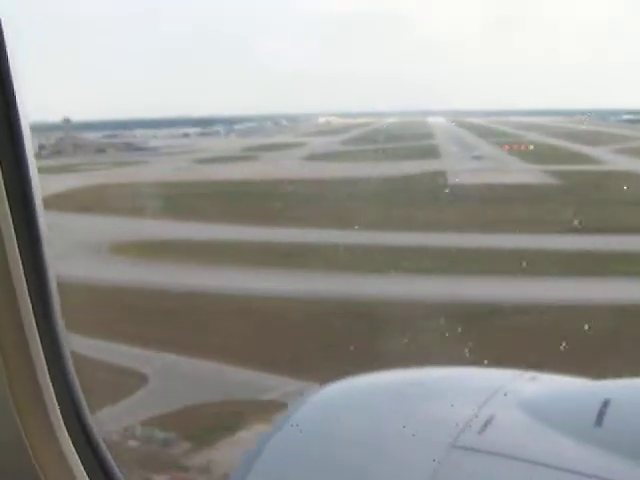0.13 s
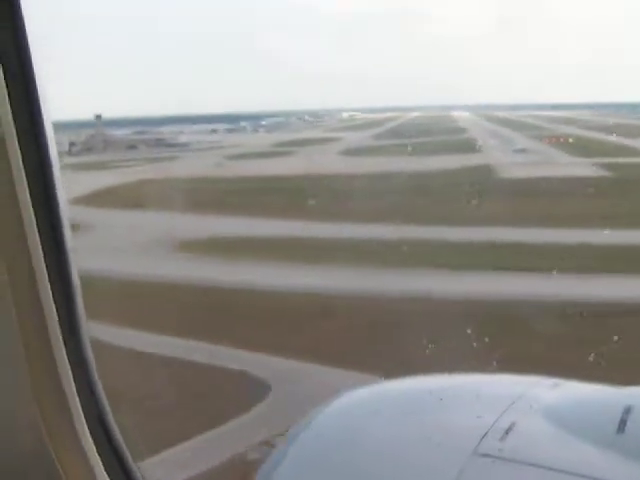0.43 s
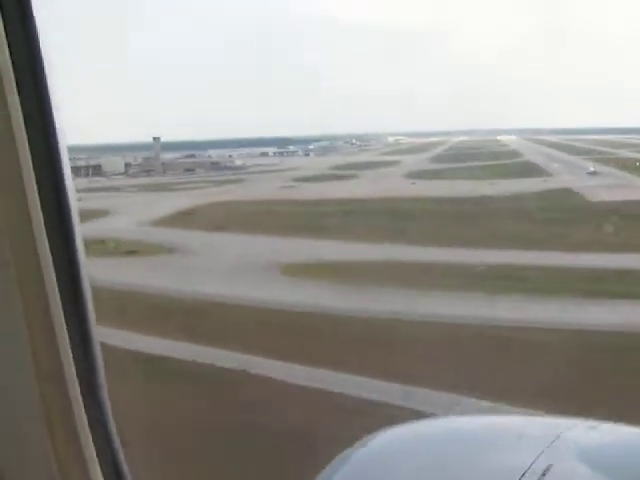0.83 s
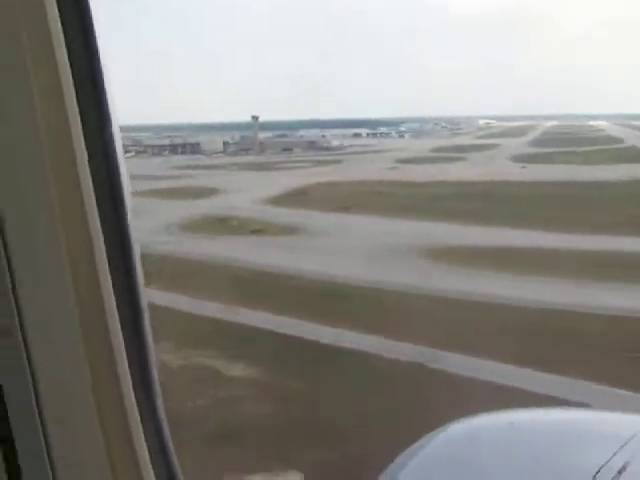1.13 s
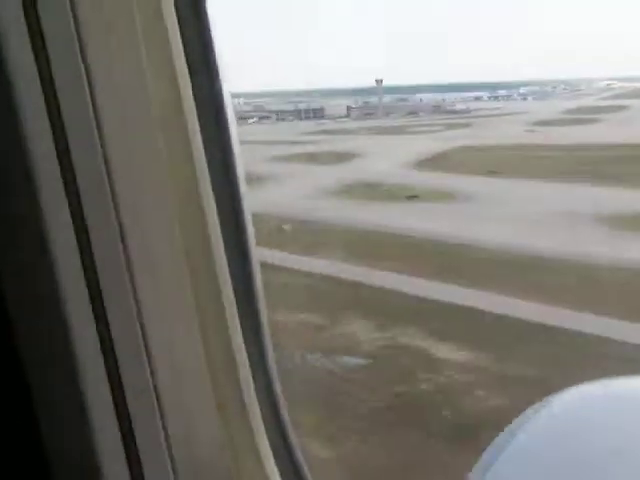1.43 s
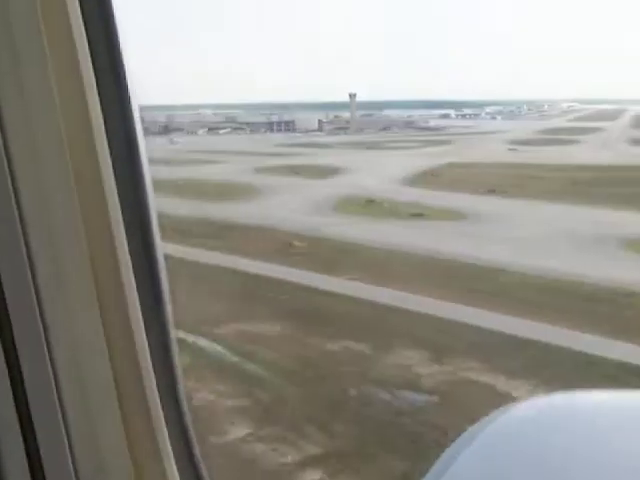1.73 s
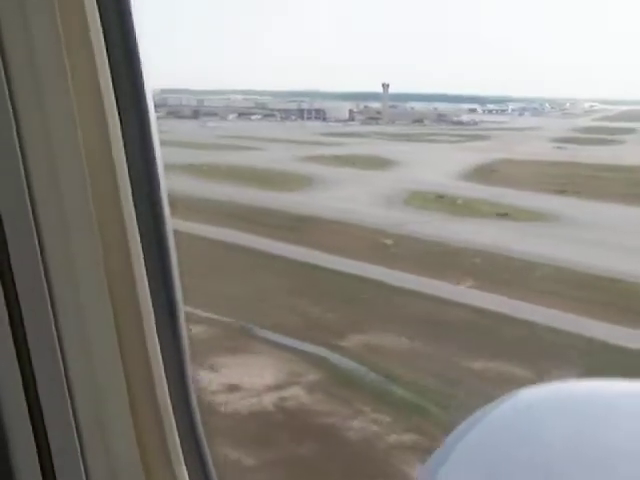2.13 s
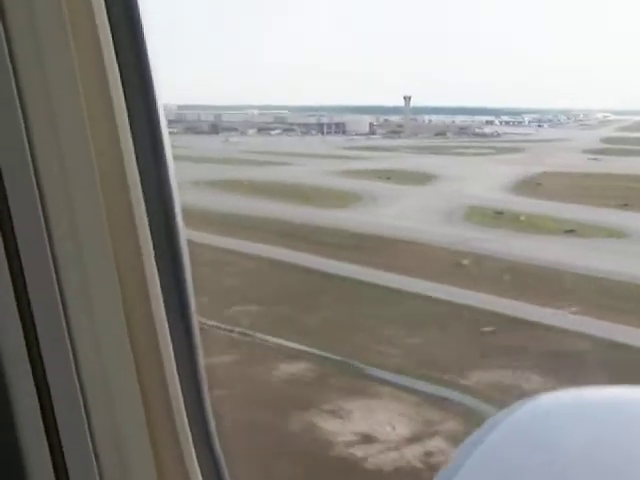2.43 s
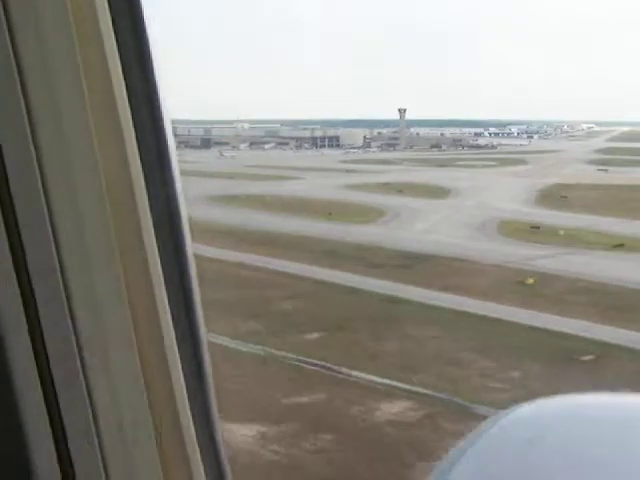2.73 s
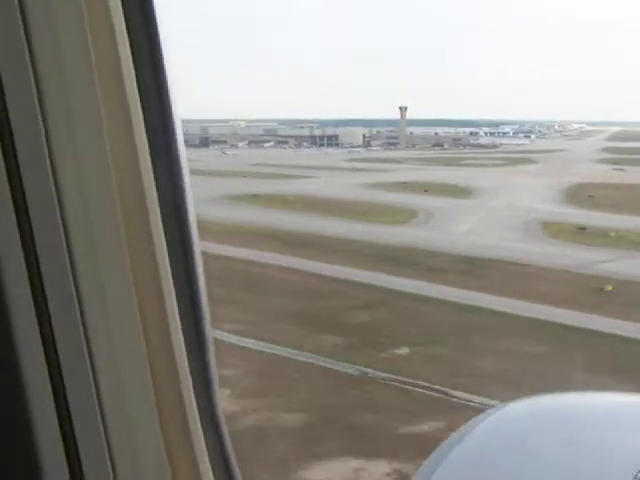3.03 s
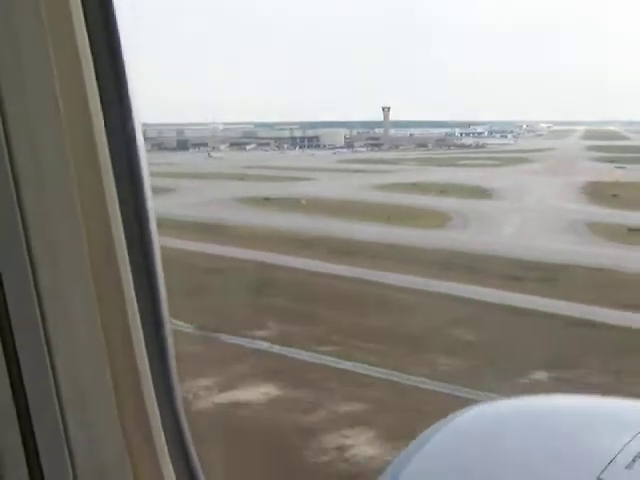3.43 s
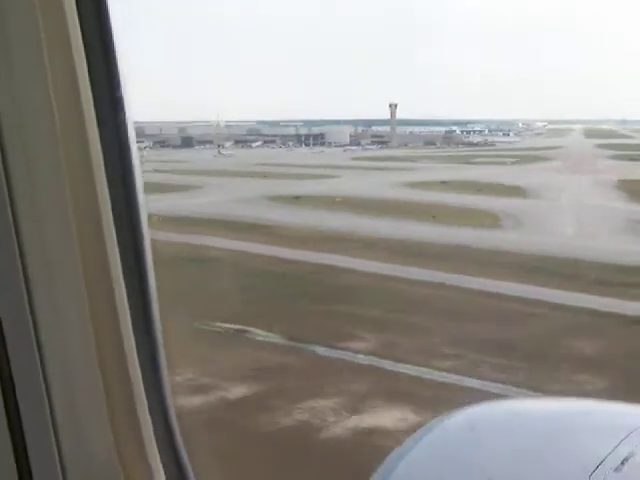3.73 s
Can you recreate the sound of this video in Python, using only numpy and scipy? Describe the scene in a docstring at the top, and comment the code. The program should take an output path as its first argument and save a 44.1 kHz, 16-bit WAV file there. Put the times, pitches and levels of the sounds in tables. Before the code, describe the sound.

Deep, uneven engine and airflow rumble runs throughout in an airliner cabin, with soft air hiss, a faint wavering mid hum and thin high whines. Blunt low thumps hit near 0.1, 0.65, 1.25 and 1.85 seconds, then crowd together from 2.1 to 3.8, most making the roar dip and recover. Small ticks fall around 0.7, 1.1, 2.45 and 3.5, among faint brief squeaks. The nearby microphone overloads on peaks.

```python
"""Airliner cabin at a window seat, low over an airport

Deep engine and airflow rumble comes through the wall as filtered noise, with a softer bed of air hiss.
Single low thumps punch out of it; after most of them the cabin sound ducks and creeps back.
A hum and three whines waver as drifting sines; filtered clicks and swelling tones tick and squeak nearby.
Two microphone ports colour it all, then a limiter and hard clipping trim the highest peaks."""
import sys
import numpy as np
from scipy import signal
from scipy.fft import rfft, irfft, next_fast_len
from scipy.io import wavfile
from scipy.ndimage import uniform_filter1d, minimum_filter1d, map_coordinates

SR = 44100
rng = np.random.default_rng(int(sys.argv[2]) if len(sys.argv) > 2 else 0)


def persist_wave(psi):
    """Save psi, clipped to +-1, as 16-bit WAV."""
    counts = np.round(np.clip(psi, -1, 1) * 32767).astype(np.int16)
    wavfile.write(sys.argv[1], SR, np.atleast_2d(counts).T)


N = 171108
T = np.arange(N) / SR  # seconds

# Low pressure thumps: time_s, signed_peak (before the ports), duck_db (a negative duck lifts the level)
THUMPS = [(0.1115, 0.85, 0), (0.1439, -1.3, 4), (0.6565, 1.33, 4.5), (1.2491, 0.98, 3),
          (1.8403, -1.32, 2.5), (2.09, 1.1, 0.5), (2.2851, 0.74, 3), (2.7565, 1.1, 1.5),
          (2.878, 1.05, 0.95), (3.103, -1.23, 2.5), (3.2761, -1.04, 1.5), (3.4234, -0.99, -0.5),
          (3.585, 1.07, 2.5), (3.7596, -1.34, 1.5)]


def amp(db):
    """Decibels to amplitude."""
    return 10 ** (np.asarray(db) / 20)


def unit(x):
    """Scale to an rms of 1."""
    return x / np.sqrt(np.mean(x ** 2) + 1e-20)


def along(points, hz):
    """Read (frequency_hz, value) points on a log-frequency axis."""
    point_hz, value = np.transpose(points)
    return np.interp(np.log(hz + 1), np.log(point_hz + 1), value)


def curve(rows):
    """Read (time_s, value) points at every sample."""
    return np.interp(T, *np.transpose(rows))


def wobble(rate):
    """A smooth random curve with rate knots a second."""
    knots = rng.standard_normal(int(N * rate / SR) + 4)
    return map_coordinates(knots, [T * rate])


def filtered(x, response):
    """Filter x by a complex response of frequency."""
    size = next_fast_len(N + SR // 2)
    hz = np.fft.rfftfreq(size, 1 / SR)
    return irfft(rfft(x, size) * response(hz), size)[..., :N]


def band(centre_hz, width_hz):
    """A causal resonance that passes a band around its centre."""
    return lambda hz: 1j * hz * width_hz / (centre_hz ** 2 - hz ** 2 + 1j * hz * width_hz)


def panned(db, pan_db):
    """Left and right gains; a positive pan leans left."""
    return amp(db + np.array([[pan_db], [-pan_db]]) / 2)


def swayed(x, rows, split_hz):
    """Move level and tone along (time_s, level_db, tilt_db); the tilt pivots about split_hz."""
    time_s, level_db, tilt_db = np.transpose(rows)
    tilt = amp(np.interp(T, time_s, tilt_db) / 2)
    low = filtered(x, lambda hz: 1 / (1 + (hz / split_hz) ** 4))
    high = x - low
    return amp(np.interp(T, time_s, level_db)) * (low / tilt + high * tilt)


def rush(spectrum, patchy_db):
    """Stereo noise of rms 1: random gain patches in time and pitch, width set by mid and side."""
    # Left-right likeness: frequency_hz, correlation (1 is mono, 0 unrelated)
    likeness = [(60, 0.99), (250, 0.99), (500, 0.97), (800, 0.88), (1000, 0.75), (1300, 0.054), (2200, 0.4),
                (3000, -0.046), (5000, -0.061)]
    grains = signal.stft(rng.standard_normal((2, N)), nperseg=512)[2]
    patches = rng.standard_normal(grains.shape[1:])
    patches = uniform_filter1d(patches, size=6, axis=0)   # across frequency
    patches = uniform_filter1d(patches, size=12, axis=1)  # across time
    pair = signal.istft(grains * amp(patchy_db * unit(patches)), nperseg=512)[1][:, :N]

    def mid_side(hz):
        turn = np.arccos(np.clip(along(likeness, hz), -1, 1)) / 2
        return amp(along(spectrum, hz)) * [np.cos(turn), np.sin(turn)]

    mid, side = filtered(pair, mid_side)
    return unit(np.array([mid + side, mid - side]))


def rumble():
    """Engine and airflow noise through the wall, uneven in level and making way for each thump."""
    # Rumble colour: frequency_hz, relative_density_db (per Hz)
    colour = [(12, -45), (22, -15.5), (32, -7), (40, -4), (48, 1.5), (62, -6.5), (80, -7.5), (95, -6.5),
              (112, -9.5), (135, -6.5), (178, -15), (216, -14), (274, -22), (392, -23.5), (425, -28),
              (460, -31.5), (500, -32.5), (540, -37), (700, -54.5), (910, -63), (1540, -120)]
    # Rumble level: time_s, level_db, tilt_db (towards the upper part)
    level = [(0.0, -10.5, -2), (0.15, -10, -0.5), (0.16, -12.5, -1), (0.67, -6, -5), (0.85, -12.5, 5.5),
             (0.87, -9, -0.5), (1.41, -7, -3.5), (1.47, -13.5, 2), (1.53, -8, -1), (2.54, -10, 0),
             (3.15, -8.5, -1.5), (3.19, -11.5, -1), (3.27, -6.5, -2), (3.35, -13, -1), (3.41, -7.5, -3),
             (3.51, -10, 1), (3.82, -6.5, -3), (3.88, -11.5, -1.5)]
    depth, width_s = .75, .009  # share taken away at each thump, width of the gap
    gaps = sum(np.exp(-((T - time_s) / width_s) ** 2) for time_s, _, _ in THUMPS)
    noise = rush(colour, patchy_db=0.17)
    return (1 - depth * gaps) * swayed(noise, level, split_hz=120)


def thumps(gain_before):
    """Single low pressure swings, raised to offset the gain just before each one."""
    centre_hz = 55
    out = np.zeros(N)
    for (time_s, peak, _), gain in zip(THUMPS, gain_before):
        u = np.pi * centre_hz * (T - time_s)
        out += peak / gain * (1 - 2 * u * u) * np.exp(-u * u)
    return out


def ducking():
    """Gain that moves fast at each thump, returns slowly and averages 0 dB."""
    attack_s, return_s = .00025, 0.46  # time constants
    table = np.array(THUMPS)
    age = np.maximum(T - table[:, :1], 0)
    dips_db = table[:, 2:] * (1 - np.exp(-age / attack_s)) * np.exp(-age / return_s)
    dip_db = dips_db.sum(0)
    return amp(dip_db.mean() - dip_db)


def hum():
    """A sine whose pitch and level drift slowly with a small random waver."""
    # Hum drift: time_s, pitch_hz, level_db (rms)
    drift = [(0, 483, -37), (.18, 485, -41), (.4, 483, -37), (.8, 484, -36), (1.37, 486, -37),
             (1.8, 484, -37.5), (2.1, 480, -32), (2.35, 478, -33), (2.65, 476, -36), (3.03, 479, -30.5),
             (3.3, 487, -37), (3.6, 491, -33.5), (3.88, 489, -38)]
    time_s, pitch_hz, level_db = np.transpose(drift)
    level = amp(np.interp(T, time_s, level_db) + 1.2 * wobble(6))
    pitch = np.interp(T, time_s, pitch_hz) + .5 * wobble(5)
    return np.sqrt(2) * level * np.sin(2 * np.pi * np.cumsum(pitch) / SR)


def whines():
    """Wavering sines near fixed pitches, each in a skirt of narrow noise, sharing one level curve."""
    # Whines: pitch_hz, tone_db, skirt_db (both before the shared level), skirt_width_hz, left_lead_rad
    voices = [(1480, -49.5, -53, 40, 1.94), (2176, -60, -61, 25, 0.48), (2990, -74, -59, 110, 5.8)]
    # Shared whine level: time_s, level_db
    swell = [(0, -5), (.7, 0.5), (1, -1), (1.7, 3.5), (2.3, 2.5), (2.6, 1.5), (3, 1), (3.88, 6)]
    out = np.zeros((2, N))
    for pitch_hz, tone_db, skirt_db, width_hz, lead in voices:
        phase = 2 * np.pi * np.cumsum(pitch_hz + 1.5 * wobble(10)) / SR
        tone = np.sin(phase + np.array([[lead], [0]]))
        out += np.sqrt(2) * amp(tone_db + wobble(5.9)) * tone
        noise = rng.standard_normal((2, N))
        skirt = filtered(noise, lambda hz: band(pitch_hz, width_hz)(hz) ** 2)
        out += amp(skirt_db) * unit(skirt)
    return amp(curve(swell)) * out


def ticks():
    """A one-sample click and a short decaying noise rattle, ringing through a resonant band."""
    # Ticks: time_s, strength_db (before the band), pan_db (left over right), centre_hz, width_hz,
    # rattle_db (against the click), rattle_t60_s
    taps = [(0.6894, -1.5, -.5, 6000, 3600, -24, 0.08), (.7075, -19, -4, 5300, 3000, -4, 0.034),
            (1.1098, 0, -8, 2700, 3800, -24, .03), (2.4270, -7, -2, 4500, 5000, -7.5, 0.075),
            (2.4975, -10, -2, 2700, 1500, -10, .03), (3.4985, -2.5, 0, 2400, 1500, -12, .035)]
    out = np.zeros((2, N))
    for time_s, db, pan_db, centre_hz, width_hz, rattle_db, t60_s in taps:
        click = np.zeros(N)
        click[round(time_s * SR)] = 1
        age = np.maximum(T - time_s, 0)
        onset = 1 - np.exp(-age / 0.00019)
        rattle = amp(rattle_db - 60 * age / t60_s) * onset * rng.standard_normal((2, N))
        tick = filtered(click + rattle, lambda hz: band(centre_hz, width_hz)(hz) ** 2)
        out += panned(db, pan_db) * tick
    return out


def squeaks():
    """Short soft swells of a tone blurred by random level and phase."""
    # Squeaks: time_s (middle), length_s (between the 1/e points), pitch_hz,
    # blur_rate (knots a second), level_db, pan_db (left over right)
    chirps = [(.063, .04, 5700, 450, -46.5, 8), (.18, .1, 650, 8, -36, 0), (.25, .045, 3370, 30, -53, 6),
              (1.09, .08, 940, 10, -39, 0), (1.66, .06, 745, 20, -39, 0), (2.188, .035, 5680, 300, -47, 8),
              (2.385, .06, 675, 12, -39, 0), (3.232, .03, 5650, 500, -50, 8)]
    out = np.zeros((2, N))
    for time_s, length_s, pitch_hz, blur_rate, db, pan_db in chirps:
        level = 1 + 0.43 * wobble(blur_rate)
        tone = np.sin(2 * np.pi * pitch_hz * T + 0.85 * wobble(blur_rate))
        swell = np.exp(-(2 * (T - time_s) / length_s) ** 2)
        out += panned(db, pan_db) * level * tone * swell
    return out


def hiss():
    """Air hiss: brighter noise with a random flutter in level."""
    # Hiss colour: frequency_hz, relative_density_db (per Hz)
    colour = [(450, -26), (560, -4.5), (720, -0.5), (900, -5.5), (1300, -10.5), (1500, -7), (1800, -13),
              (2100, -9.5), (2700, -13.5), (3500, -14), (4300, -17), (5200, -16.5), (6500, -23.5),
              (7000, -21), (7600, -22.5), (8400, -28)]
    # Hiss drift: time_s, level_db (before the flutter), tilt_db (brightness)
    drift = [(0, -38, 4), (.6, -36, 1), (1.2, -36, -1), (1.8, -36, -0.5), (2.4, -36.5, -2.5),
             (2.7, -36, -2), (3.2, -36.5, -1.5), (3.88, -35.5, -1)]
    closed = [(300, -90)] + colour + [(9000, -90)]  # shut both ends of the band
    flutter = amp(0.21 * wobble(10))
    return flutter * swayed(rush(closed, patchy_db=0.88), drift, split_hz=1800)


def scene():
    """Duck the cabin sound and thumps together; ticks and squeaks stay outside the ducking."""
    gain = ducking()
    gain_before = np.array([gain[round(time_s * SR) - 1] for time_s, _, _ in THUMPS])
    cabin = rumble() + hiss() + hum() + whines() + thumps(gain_before)
    return gain * cabin + ticks() + squeaks()


def port(hz, corner_hz, ring_hz, sharp, bass_db, treble_db):
    """One microphone port: bass roll-off, a treble resonance and a bass-to-treble gain slope."""
    gain = amp(along([(500, bass_db), (1800, treble_db)], hz))
    roll_off = 1j * hz / (corner_hz + 1j * hz)
    resonance = 1 / (1 - (hz / ring_hz) ** 2 + 1j * hz / (ring_hz * max(sharp, 1)))
    return gain * roll_off * resonance


def limited(x):
    """A quick stereo limiter: looks slightly ahead, holds its lowest gain, then smooths it."""
    ceiling = 1.03
    hold, smooth = round(.02 * SR), round(.002 * SR)  # samples
    need = np.minimum(1, ceiling / (np.abs(x).max(0) + 1e-9))
    lag = round(.02 * SR / 2) - round(.002 * SR / 2)  # turns the hold window towards the past
    held = minimum_filter1d(need, size=hold, origin=lag)
    return x * uniform_filter1d(held, size=smooth)


def record(dry):
    """Two microphone ports, the limiter, hard clipping and a top band limit."""
    # Ports, left then right: bass_corner_hz, resonance_hz, sharpness (Q), bass_gain_db, treble_gain_db
    mic_ports = [(44, 5850, 6.67, -0.52, -2.5), (6, 5080, 6, -1.1, -0.64)]
    clip_top, clip_hard, top_hz = .99, 40, 8420  # ceiling, knee hardness, middle of the treble cut
    x = filtered(dry, lambda hz: np.array([port(hz, *settings) for settings in mic_ports]))
    x = limited(x)
    x = x / (1 + np.abs(x / clip_top) ** clip_hard) ** (1 / clip_hard)
    return filtered(x, lambda hz: np.clip((top_hz + 150 - hz) / 300, 0, 1) ** 2)


dry = scene()
out = record(dry)
persist_wave(out)
```